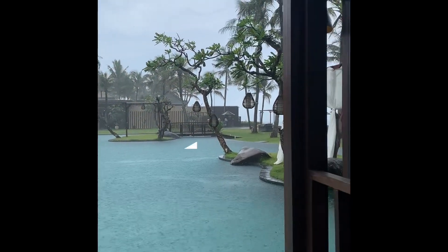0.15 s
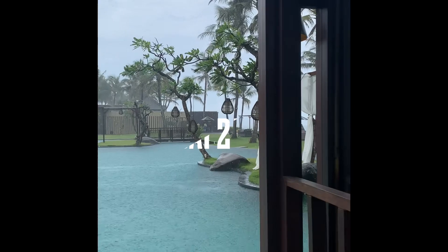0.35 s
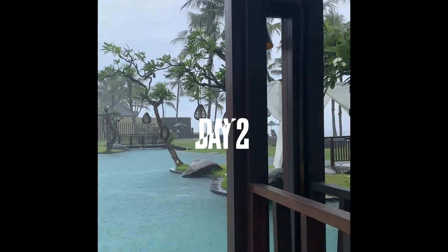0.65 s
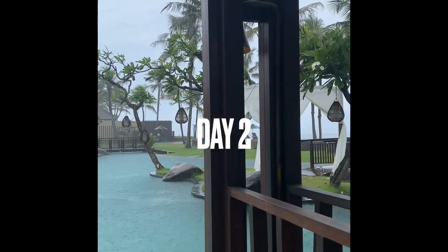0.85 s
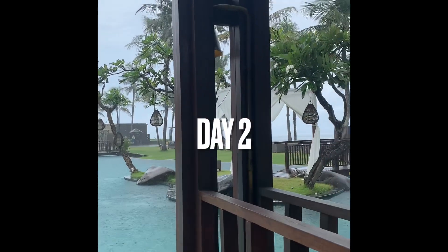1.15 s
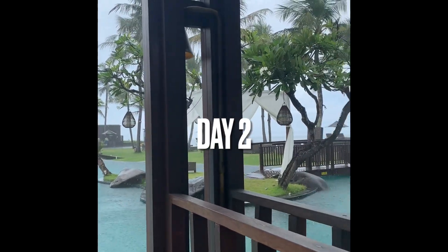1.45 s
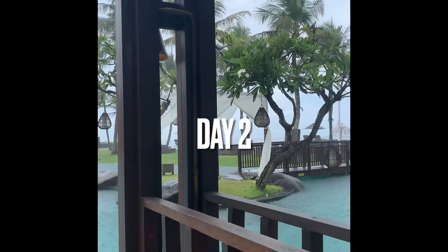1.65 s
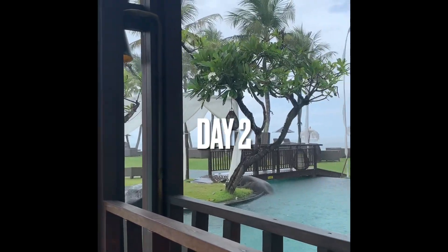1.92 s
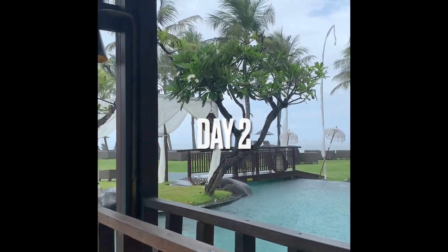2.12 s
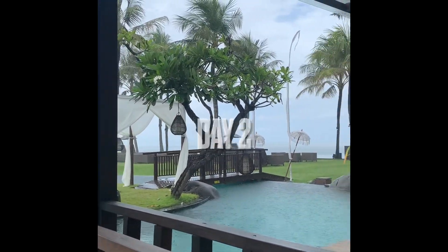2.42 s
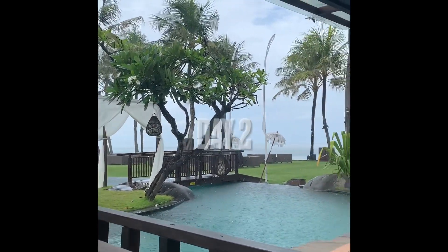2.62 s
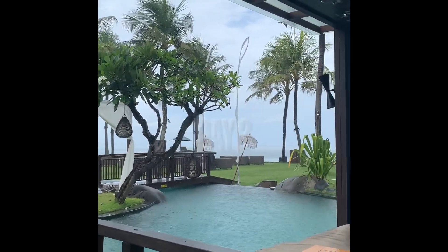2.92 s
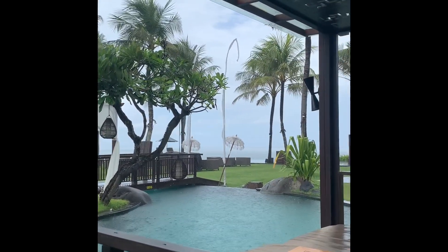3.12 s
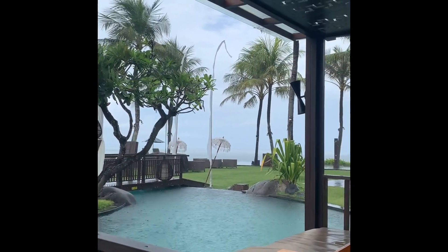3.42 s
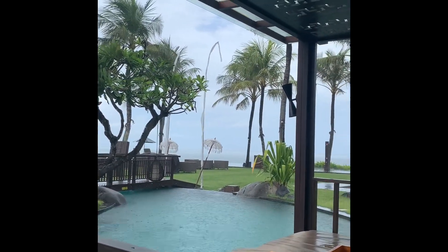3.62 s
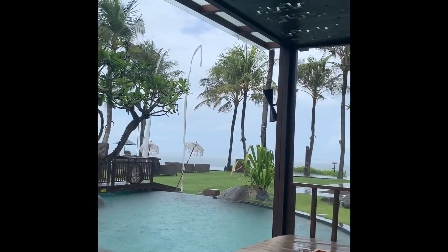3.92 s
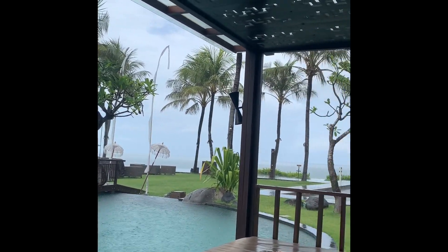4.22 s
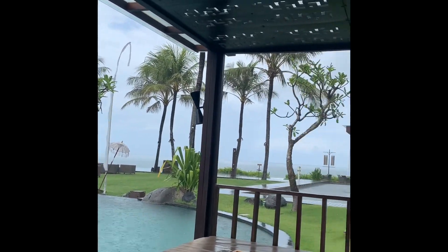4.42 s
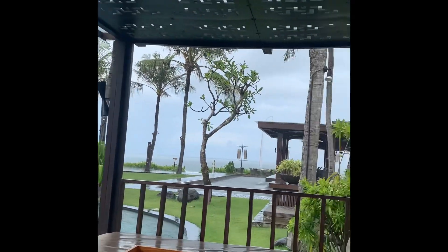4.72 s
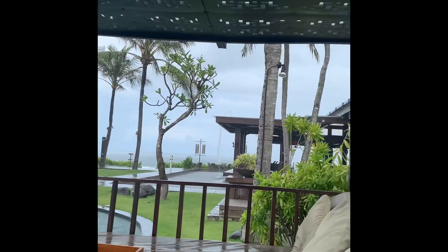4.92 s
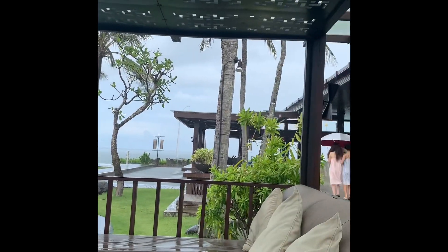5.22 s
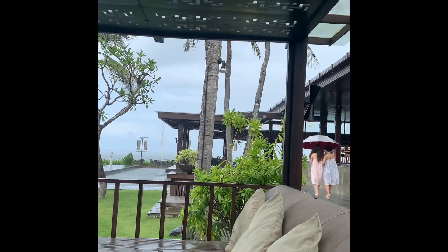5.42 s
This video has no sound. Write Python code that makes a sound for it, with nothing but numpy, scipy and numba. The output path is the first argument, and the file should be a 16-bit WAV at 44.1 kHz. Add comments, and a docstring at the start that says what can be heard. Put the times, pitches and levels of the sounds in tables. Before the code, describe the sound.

Steady heavy rain falls on a swimming pool and covered terrace, with small splashes, faint gurgling and soft wind thumps.

```python
"""Heavy tropical rain hisses on a pool and drums on the roof of a covered terrace. Countless drops blend into a
wash of noise, the deck booms, and near drops splash. Air trapped in the water rings as bubbles, runoff gurgles,
and faint high tones plink. Gusts buffet the two microphone openings (ports) of a hand-held phone that turns
slowly."""
import sys
import numpy as np
from scipy import signal
from scipy.fft import rfft, irfft, next_fast_len
from scipy.io import wavfile
from scipy.ndimage import uniform_filter1d
from numba import njit

SR = 44100
rng = np.random.default_rng(int(sys.argv[2]) if len(sys.argv) > 2 else 0)


def wrap_up_sound(samples):
    """Save the sound to the file named by the first command line argument, as 16-bit audio."""
    columns = np.atleast_2d(samples).T
    # keep every value between -1 and 1, then stretch to whole-number steps
    tamed = np.clip(columns, -1, 1)
    steps = np.round(tamed * 32767).astype(np.int16)
    wavfile.write(sys.argv[1], SR, steps)


N = 244755
FFT_SIZE = next_fast_len(N, True)
BINS_HZ = np.arange(FFT_SIZE // 2 + 1) * SR / FFT_SIZE + 1


def undb(db):
    """Turn decibels into a number to multiply by."""
    return 10 ** (np.asarray(db) / 20)


def unit(x):
    """Scale a sound so its average strength (rms) is 1."""
    return x / np.sqrt(np.mean(x ** 2))


def colour(x, points):
    """Make some pitches louder and others softer, following (frequency [Hz], level [dB]) points."""
    hz, db = np.transpose(points)
    gain = undb(np.interp(np.log(BINS_HZ), np.log(hz), db, -120, -120))
    return irfft(rfft(x, FFT_SIZE) * gain, FFT_SIZE)[:, :N]


def wander(per_s):
    """Slide to a new random value, about 1 in size, per_s times a second."""
    hold = int(SR / per_s)
    steps = np.repeat(rng.standard_normal(N // hold + 1), hold)
    return unit(uniform_filter1d(steps, hold)[:N])


def patter(per_s, spread_db, tail_s, far_share):
    """Loudness of drops: each starts suddenly and fades fast, over an even wash of far drops."""
    when, chance = rng.random((int(per_s * N / SR), 2)).T
    size = undb(spread_db * np.minimum(-np.log(1 - chance), 3))  # many small drops, none huge
    hits = np.zeros(N)
    np.add.at(hits, (when * N).astype(int), size ** 2)
    power = signal.lfilter([1], [1, -np.exp(-2 / (tail_s * SR))], hits)
    return np.sqrt(far_share + (1 - far_share) * power / power.mean())


def noise_pair(tone, loudness):
    """Two unrelated noises with the same tone and loudness."""
    return unit(colour(loudness * rng.standard_normal((2, N)), tone))


@njit
def ring(start, hz, size, cycles, glide, length):
    """Fading tones that each slide upward."""
    out = np.zeros(length)
    for k in range(len(start)):
        fade_samples = cycles * SR / hz[k]
        step = 2j * np.pi * hz[k] / SR
        wave = size[k] + 0j
        turn = np.exp(step - 1 / fade_samples)  # moves the wave on and shrinks it
        rise = np.exp(step * glide / fade_samples)
        for i in range(start[k], min(start[k] + int(5 * fade_samples), length)):
            wave *= turn
            turn *= rise
            out[i] += wave.imag
    return out


def swarm(per_s, low_hz, high_hz, cycles):
    """Many short ringing tones at random times and pitches."""
    sides = []
    for _ in range(2):
        when, pitch, size = rng.random((int(per_s * N / SR), 3)).T
        hz = low_hz * (high_hz / low_hz) ** (pitch ** 1.2)
        sides.append(ring((when * N).astype(np.int64), hz, undb(22.0 * size), cycles, 0.021, N))
    return unit(np.array(sides))


def stereo(sound):
    """Left and right are more or less alike by pitch; the hiss near 9-11.6 kHz sounds centred."""
    # left and right: (frequency [Hz], likeness [0-1], right lag [rad], left minus right [dB])
    side_match = [(30, .2, -.5, -1), (45, 0.35, -0.5, -.8), (70, .55, 0, -.3), (120, 0.56, 0, -0.2),
                  (200, .66, -.2, -.5), (302, 0.87, -0.5, -0.8), (520, 0.91, -0.5, -1), (900, 0.6, 0, -0.7),
                  (1910, 0.67, 0, -1), (2550, 0.46, 1, -3), (2930, 0.17, 2.5, -5), (3270, 0.6, 3, -1),
                  (3950, 0.31, 3, -.4), (5160, 0.3, 1.3, -0.5), (6020, 0.85, 3, 1), (6600, 0.98, 3, -1.5),
                  (7170, 0.6, 4, 1), (8850, .7, 5.5, 0.5), (9150, .998, 6.28, 0), (11600, .998, 6.28, 0),
                  (11900, .74, 7, .2), (13650, .65, 8.5, 1), (14050, .85, 9, 0), (14400, 1, 9.425, 0),
                  (16000, 1, 9.425, 0)]
    hz, *columns = np.transpose(side_match)
    like, lag, pan_db = (np.interp(BINS_HZ, hz, c) for c in columns)
    left, other = rfft(sound, FFT_SIZE)
    right = like * np.exp(-1j * lag) * left + np.sqrt(1 - np.clip(like, 0, 1) ** 2) * other
    return irfft(np.array([left * undb(pan_db / 2), right * undb(-pan_db / 2)]), FFT_SIZE)[:, :N]


def wind_rumble(t):
    """Swirls of air shake the microphones unevenly."""
    # tone of the rumble: (frequency [Hz], level [dB])
    tone = [(20, -34), (32, -19), (45, -11.5), (63, -5), (100, 1), (130, -3.5), (200, -6), (280, -15.5),
            (450, -28)]
    # strength of the gusts: (time [s], level [dB])
    gusts = [(0.0, -41.5), (.2, -43), (.29, -46.5), (.36, -43), (0.44, -46.5), (0.52, -48), (0.6, -43.5),
             (.69, -48.5), (0.8, -46), (0.92, -44), (1.17, -48), (1.33, -47), (1.6, -46.5), (2.1, -49.5),
             (2.47, -50.5), (2.65, -48), (2.8, -47), (3.0, -46.5), (3.25, -47.5), (3.5, -45.5), (3.69, -47),
             (3.95, -44.5), (4.12, -48.5), (4.35, -45.5), (4.6, -46), (4.67, -48), (4.74, -43.5),
             (4.95, -43.5), (5.38, -42), (5.55, -44)]
    flutter = undb(1.5 * wander(18))
    return noise_pair(tone, flutter) * undb(np.interp(t, *np.transpose(gusts)))


def wind_puffs(t):
    """The strongest swirls push the microphones in single swings that slow as they pass."""
    # puffs: (time [s], level [dB], swing rate [Hz], length [s], left minus right [dB])
    thumps = [(0.064, -22.5, 190, 0.007, 1), (.078, -26.5, 111, 0.021, -5), (0.23, -32.5, 113, 0.022, 0),
              (.317, -40, 130, 0.013, 0), (0.349, -34, 100, 0.021, -1), (0.372, -33, 94, 0.025, 1),
              (.419, -37, 111, .02, 0), (.58, -35, 171, 0.017, 0), (0.599, -32, 86, 0.03, 1),
              (0.647, -32, 99, 0.016, -4), (0.89, -41, 105, 0.026, 2), (.947, -40, 119, 0.026, -2),
              (1.033, -37, 115, 0.014, -1), (1.28, -39, 136, .012, 0), (1.323, -37, 112, 0.025, 0),
              (1.369, -41, 104, 0.02, 1), (1.794, -40, 107, .02, -4), (1.949, -37.5, 125, .015, -3),
              (2.032, -40, 116, .015, 1), (2.074, -39, 103, .014, -6), (2.254, -39, 114, 0.014, -2),
              (2.299, -36, 130, .012, 0), (2.31, -36, 105, .018, 0), (2.401, -46, 113, 0.014, -1),
              (2.957, -39, 134, 0.0094, 0), (3.397, -40, 107, 0.015, 1), (3.575, -20, 112, 0.021, 2),
              (3.828, -37, 115, 0.02, -2), (3.891, -39, 121, .013, 4), (4.002, -36, 112, 0.025, 1),
              (4.213, -39, 107, .014, -9), (4.296, -35.5, 100, 0.019, 1), (4.423, -39, 111, .028, 0),
              (4.517, -37, 125, .022, 0), (4.595, -35.5, 105, 0.035, 1), (4.747, -34, 114, 0.026, -1),
              (4.79, -34, 120, 0.024, -1), (4.866, -34.5, 129, .02, -1), (4.981, -37, 144, .015, -5),
              (5.11, -35, 118, 0.023, 1), (5.151, -34, 95, 0.024, 1), (5.187, -36.5, 137, .017, 1),
              (5.265, -36.5, 100, .03, 0), (5.321, -33, 118, .019, -1), (5.356, -31, 154, 0.022, 0),
              (5.421, -35, 111, .015, 1), (5.495, -36, 110, 0.026, 2)]
    lag_s, lead_s = 0.00057, 0.0018  # a puff hits the right port first, and peaks just before its dip
    out = np.zeros((2, N))
    for s, db, hz, length, pan_db in thumps:
        near = slice(max(int((s - .05) * SR), 0), int((s + .05) * SR))
        age = t[near] - s + lag_s / 2 * np.array([[-1], [1]])
        slowing = 1 - 24.0 * np.clip(age, -.03, .03)
        swing = -np.cos(2 * np.pi * hz * age * slowing)
        swell = np.exp(-(3.0 * (age + lead_s) / length) ** 2)
        out[:, near] += swing * swell * undb(db + np.array([[pan_db], [-pan_db]]) / 2)
    leak = signal.butter(1, 22, "high", fs=SR, output="sos")  # the slowest part slips past the microphone
    return signal.sosfiltfilt(leak, out)


def plinks():
    """A faint, dense swarm of short, high ringing tones."""
    return swarm(per_s=120, low_hz=1406, high_hz=5540, cycles=21.4) * undb(-58 + 1.5 * wander(6))


def runoff(level_db):
    """Small bubbles gurgle where water runs into the pool."""
    gurgle = swarm(per_s=300, low_hz=781.2, high_hz=2606, cycles=16.8)
    return gurgle * undb(level_db + 0.88 * wander(4.1))


def deck(level_db):
    """Rain on the deck makes a low, wavering boom."""
    # tone of the deck: (frequency [Hz], level [dB])
    tone = [(150, -19), (240, -5), (310, 0.5), (400, -8), (650, -9), (900, -25)]
    return noise_pair(tone, undb(1.6 * wander(6.06))) * undb(level_db)


def bubbles(t):
    """Trapped air rings and shifts a little in pitch."""
    # bubbles: (time [s], pitch [Hz], level [dB], time to fade 60 dB [s], glide [share], rise time [s])
    rings = [(1.494, 2860, -33.5, 0.022, 0.04, .0012), (2.59, 924, -43.5, 0.19, -0.018, 0.0077),
             (2.662, 2060, -44, .06, .01, .003), (2.7, 1790, -47, .2, .01, .005),
             (2.78, 1950, -45, .1, 0.01, .004), (2.795, 1454, -44, .06, 0.014, .003),
             (2.903, 2060, -46, .07, .01, .003), (2.98, 2050, -44, .06, .01, .003),
             (4.92, 997, -39, 0.1, 0.015, .007)]
    out = np.zeros(N)
    for s, hz, db, fade_s, glide, rise_s in rings:
        age = np.maximum(t - s, 0)
        note = np.sin(2 * np.pi * hz * age * (1 + glide * age / fade_s))
        out += note * undb(db - 60 * age / fade_s) * (1 - np.exp(-age / rise_s))
    return out


def splashes():
    """Near drops burst into a tick of spray; bigger drops reach lower in pitch."""
    # near drops: (time [s], level [dB], low edge of the spray [Hz], time to fade 60 dB [s])
    drops = [(0.3186, -39, 5400, .06), (.387, -46, 8500, .04), (0.417, -44, 1500, .03),
             (0.433, -41.5, 7500, .07), (0.443, -43, 6500, .04), (.452, -43, 7000, 0.044),
             (0.4913, -42, 7000, 0.041), (0.7503, -43, 5400, .06), (0.835, -42, 6500, .04),
             (1.14, -41, 7000, .03), (1.424, -45, 6500, .04), (1.494, -44, 2300, .03),
             (1.69, -43, 7000, .03), (2.4124, -43, 6500, .03), (2.6993, -47, 7000, .03),
             (2.762, -44, 8000, .05), (2.831, -45, 6500, .04), (3.2, -47, 7000, .1),
             (3.2231, -46, 1500, .03), (3.2306, -44, 6500, .09), (3.503, -45, 7000, .03),
             (4.4333, -45, 6500, .04), (4.494, -45, 7000, .03), (4.5194, -45, 6000, .05),
             (4.529, -45, 7000, .03), (4.6064, -40, 6500, .03), (4.6089, -52, 1400, 0.027),
             (5.0234, -44, 8000, .04), (5.091, -43, 9000, .02), (5.13, -36.5, 7500, .025),
             (5.154, -39, 6500, .025), (5.1545, -39, 2800, .04), (5.3133, -42, 8500, .025),
             (5.3674, -45, 6500, .04), (5.423, -43, 7000, .025)]
    octaves, top_hz, rise_s = 1.4, 14000, 0.0008
    out, age = np.zeros((2, N)), np.arange(4000) / SR
    for s, db, low_hz, fade_s in drops:
        band = signal.butter(1, [low_hz, min(low_hz * 2 ** octaves, top_hz)], "band", fs=SR, output="sos")
        fade = undb(db - 60 * age / fade_s) * (1 - np.exp(-age / rise_s))
        burst = unit(signal.sosfilt(band, rng.standard_normal((2, len(age))))) * fade
        start = int(s * SR)
        out[:, start:start + len(age)] += burst[:, :N - start]
    return out


def roof(level_db):
    """Countless drops drum on the roof."""
    # tone of the roof: (frequency [Hz], level [dB])
    tone = [(150, -6.5), (300, -2.5), (500, -3), (850, -5), (1400, -4.5), (1900, -3.5), (2200, -5.5),
            (2600, -8), (4000, -17.5), (7000, -23)]
    drumming = patter(per_s=400, spread_db=1.9, tail_s=0.0044, far_share=0.86)
    return noise_pair(tone, drumming) * undb(level_db + 0.97 * wander(8))


def pool(level_db):
    """Rain hisses on the pool; large and small drops patter in their own ranges of pitch."""
    # tone of the hiss: (frequency [Hz], level [dB])
    tone = [(1500, -13), (2500, -2.5), (3400, 2), (4600, 1), (6000, -0.5), (8000, -1), (9200, -4),
            (10400, -1), (12000, -3), (14000, -4), (16000, -12)]
    # borders between the ranges of different drop sizes: (frequency [Hz])
    edges = [20, 3300, 6300, 9000, 11500, 20000]
    shared = patter(per_s=45, spread_db=4.5, tail_s=0.0045, far_share=0.96)
    spectrum = 0
    for low, high in zip(edges, edges[1:]):
        own = patter(per_s=120, spread_db=4.0, tail_s=0.02, far_share=0.75)
        drops = shared * own * undb(0.68 * wander(7)) * rng.standard_normal((2, N))
        spectrum = spectrum + rfft(drops, FFT_SIZE) * ((BINS_HZ >= low) & (BINS_HZ < high))
    hiss = unit(colour(irfft(spectrum, FFT_SIZE), tone))
    return hiss * undb(level_db + 0.3 * wander(5.6))  # slight surges of rain


def scene():
    """Add up the rain and the wind, left and right."""
    # the rain grows as the phone turns from the deck to the roof edge:
    # (time [s], roof [dB], runoff [dB], deck [dB], pool [dB])
    rain_levels = [(0.0, -48.5, -56.5, -56.5, -47.5), (.45, -49, -56, -55.5, -47.5),
                   (.75, -49, -62, -53.5, -48), (1.1, -48, -58.5, -55, -48),
                   (1.8, -49.5, -61.5, -54.5, -48.5), (2.35, -49.5, -59, -55.5, -48),
                   (2.5, -50, -57, -58, -48), (2.7, -48, -57, -57, -48), (2.82, -49, -57, -53, -48),
                   (3.0, -49.5, -61, -56.5, -48), (3.3, -50.5, -55.5, -51.5, -47.5),
                   (3.7, -48, -56, -59.5, -48.5), (4.1, -48.5, -55.5, -59, -48.5),
                   (4.6, -47.5, -51.5, -59, -48), (5.1, -47, -54, -56, -47.5),
                   (5.55, -46.5, -52, -56.5, -47.5)]
    t = np.arange(N) / SR
    times, *columns = np.transpose(rain_levels)
    roof_db, runoff_db, deck_db, pool_db = (np.interp(t, times, c) for c in columns)
    rain = roof(roof_db) + deck(deck_db) + runoff(runoff_db) + plinks() + pool(pool_db)
    return stereo(rain + wind_rumble(t) + splashes() + bubbles(t)) + wind_puffs(t)


def record(dry):
    """The phone loses the deepest bass and the highest treble."""
    low_hz, top_hz = 24, 15740
    dry = signal.sosfilt(signal.butter(2, low_hz, "high", fs=SR, output="sos"), dry)
    return signal.sosfilt(signal.ellip(10, .2, 80, top_hz, fs=SR, output="sos"), dry)


dry = scene()
out = record(dry)
wrap_up_sound(out)
```